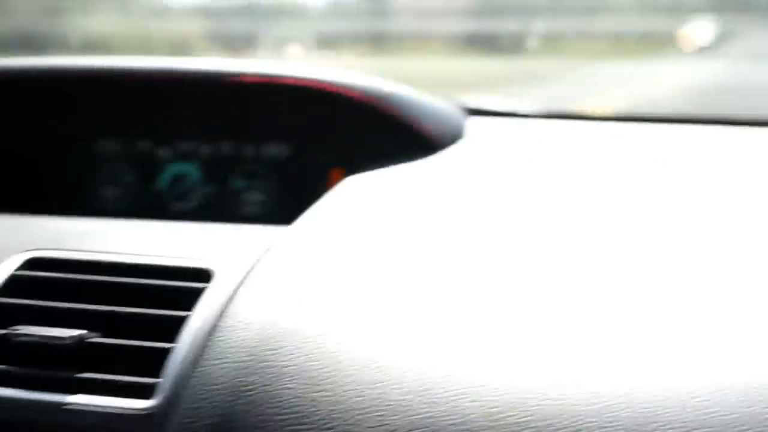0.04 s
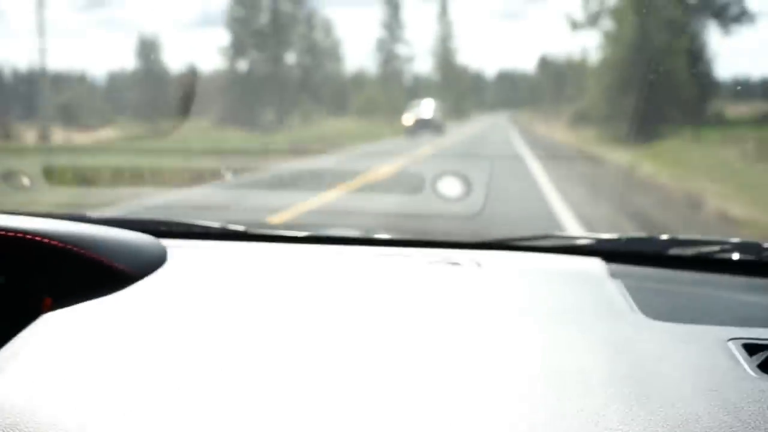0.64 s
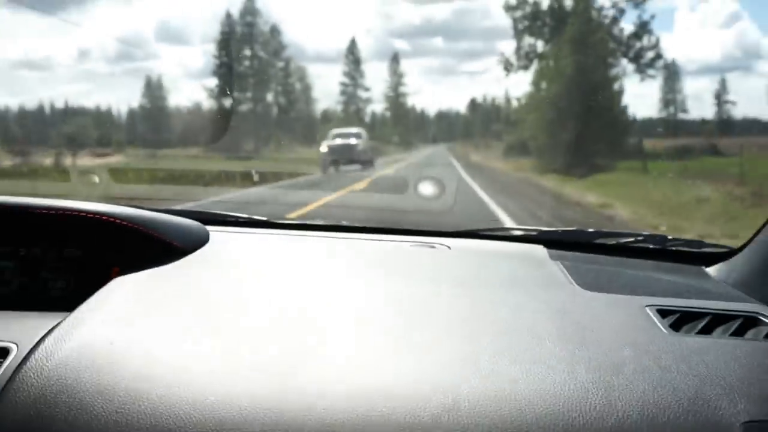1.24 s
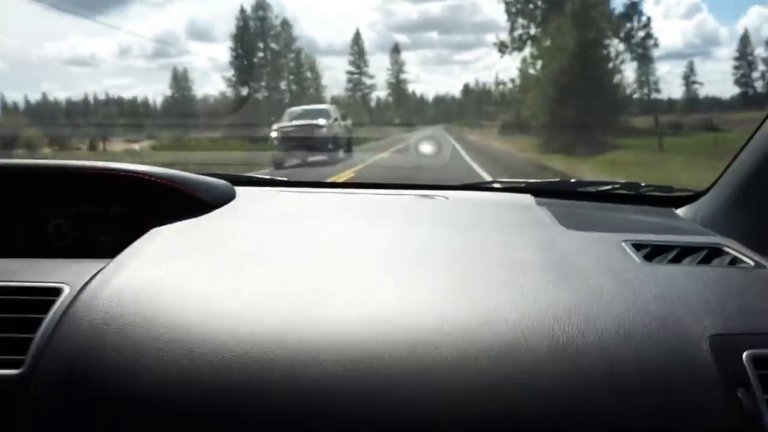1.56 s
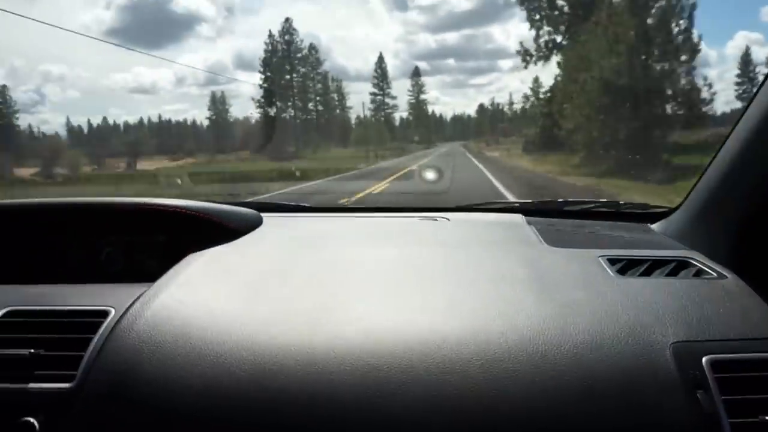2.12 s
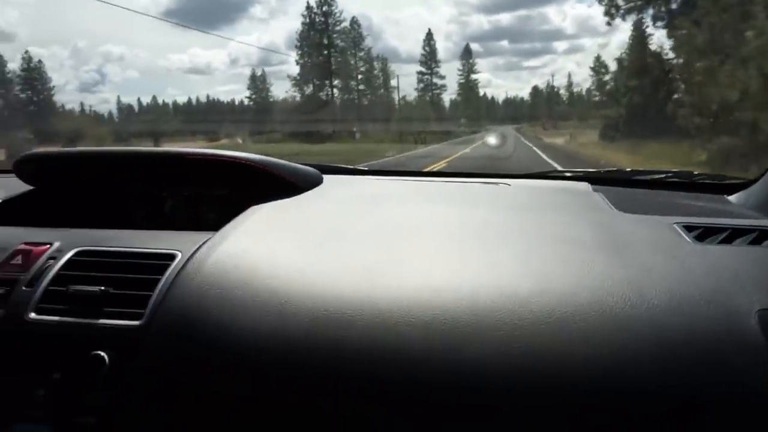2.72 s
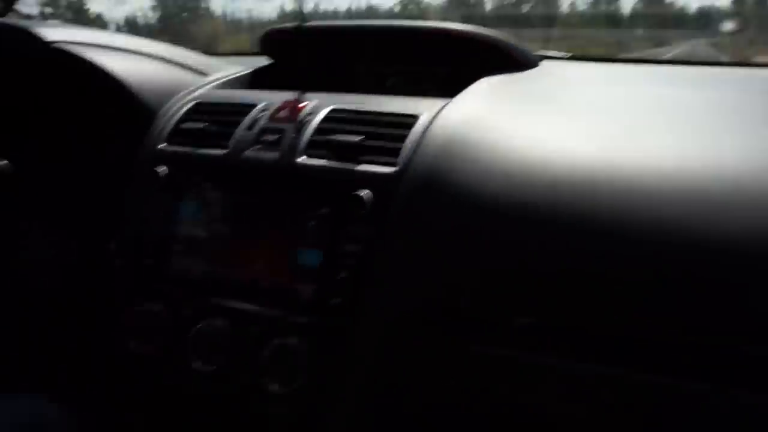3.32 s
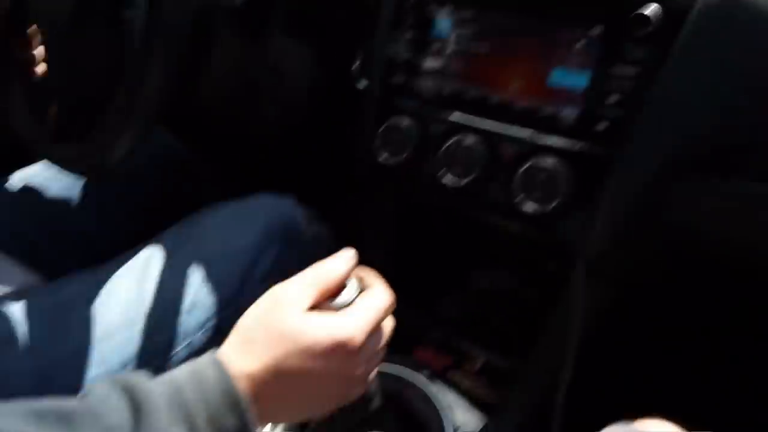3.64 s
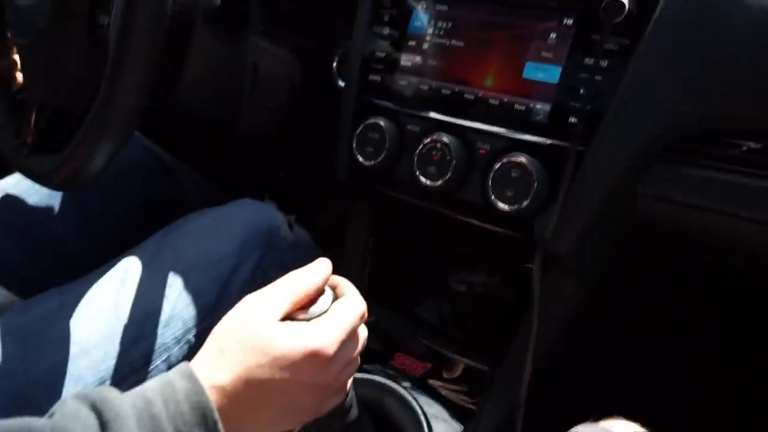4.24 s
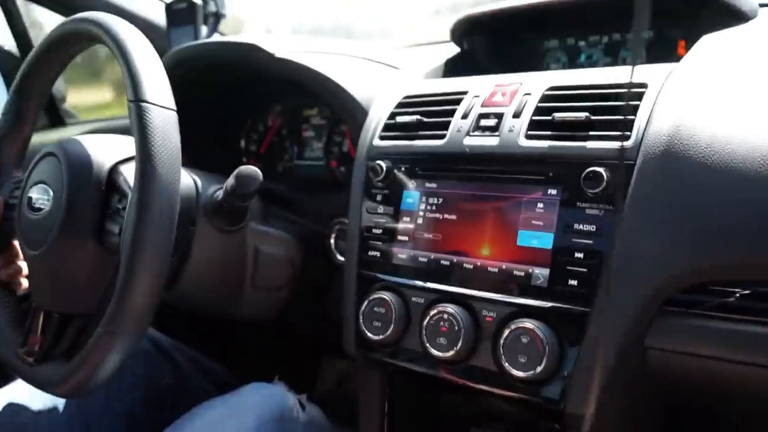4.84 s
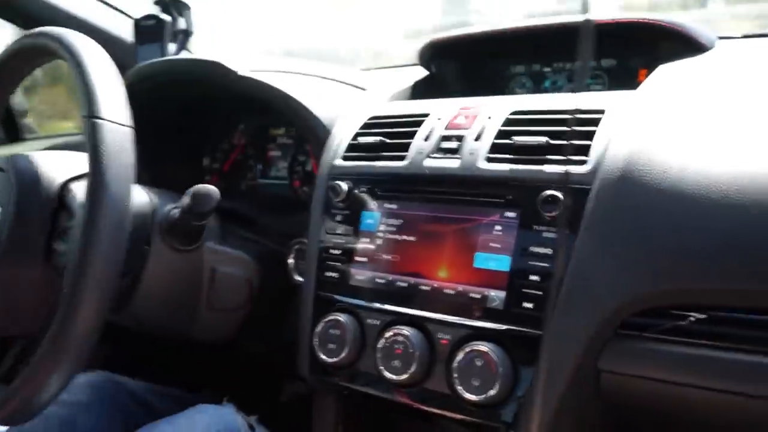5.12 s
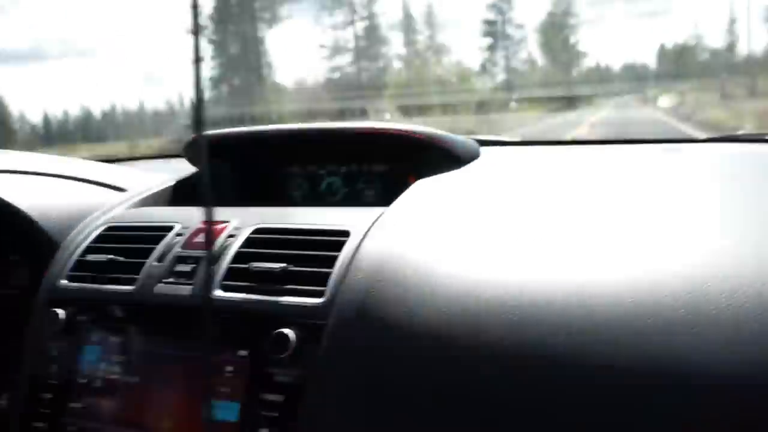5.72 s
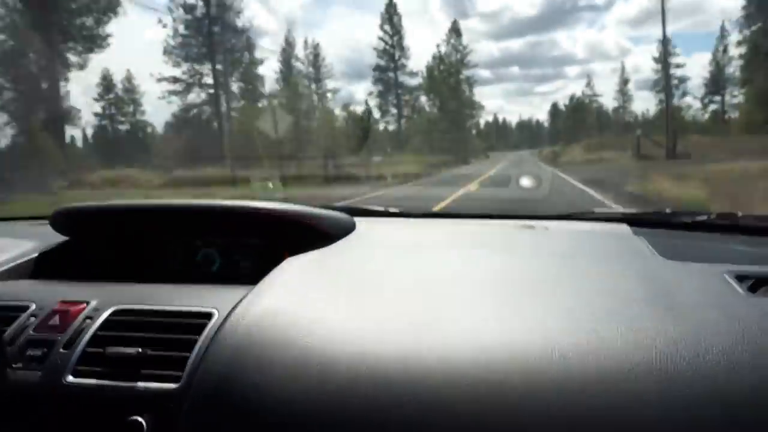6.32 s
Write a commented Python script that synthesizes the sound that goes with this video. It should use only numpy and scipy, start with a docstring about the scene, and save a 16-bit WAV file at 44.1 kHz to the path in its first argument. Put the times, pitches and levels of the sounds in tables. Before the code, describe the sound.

A turbocharged car accelerates, heard from inside, its whistle climbing over road rumble until a gearshift vents air and drops the revs.

```python
"""Inside a car, a turbocharged flat-four pulls hard. Its periodic firing booms in the cabin; uneven
combustion adds a burble and an exhaust rasp. Tyres and wind rush underneath, the trim ticks, and the
compressor's whistle climbs with its speed. At full boost the intake roars, hisses and howls; then the
throttle shuts with a falling honk, the boost air vents, the revs sink and the next gear takes up
with a thump."""
import sys
import numpy as np
from scipy import signal
from scipy.fft import rfft, irfft, next_fast_len
from scipy.io import wavfile
from scipy.ndimage import uniform_filter1d, minimum_filter1d, map_coordinates

SR = 44100
rng = np.random.default_rng(int(sys.argv[2]) if len(sys.argv) > 2 else 0)


def dump(signal):
    """Clip the signal to [-1, 1] and save it as 16-bit WAV at the path in sys.argv[1]."""
    limited = np.clip(np.atleast_2d(signal).T, -1, 1)
    pcm = np.round(limited * 32767).astype(np.int16)
    wavfile.write(sys.argv[1], SR, pcm)


N = 280476
TIME = np.arange(N) / SR
TOP_HZ = 15850

# turbo speed, as the pitch of its whistle: t/s, f/Hz
TURBO_SPEED = [(0, 3400), (1, 3900), (1.65, 4750), (2, 5580), (3, 7520), (3.42, 8600), (4.2, 10620),
               (4.4, 12200), (4.6, 14200), (4.75, 15200), (4.9, 15650), (5.1, 15600), (5.2, 14550),
               (5.45, 10050), (5.62, 8250), (5.8, 7000), (6.01, 6200), (6.36, 5680)]


def amp(db):
    """Amplitude ratio of a level in decibels."""
    return 10 ** (np.asarray(db) / 20)


def unit(x):
    """Normalisation to rms 1."""
    return x / np.sqrt(np.mean(x ** 2) + 1e-20)


def along(points, hz):
    """Interpolation of (f/Hz, value) points on a logarithmic frequency axis."""
    f, values = np.transpose(points)
    return np.interp(np.log(hz + 1), np.log(f + 1), values)


def curves(rows):
    """Linear interpolation of each column after t/s, one value a sample."""
    times, *columns = np.transpose(rows)
    return [np.interp(TIME, times, column) for column in columns]


def wobble(rate, size=N):
    """Smooth random modulation: a spline through rate knots a second."""
    knots = rng.standard_normal(16384)
    return map_coordinates(knots, [np.linspace(0, rate * N / SR, size)], mode="wrap")


def angle(hz):
    """Phase as the time integral of frequency."""
    return 2 * np.pi * np.cumsum(hz) / SR


def tone(phase):
    """A sinusoid of rms 1."""
    return np.sqrt(2) * np.cos(phase)


def band(phase, rate):
    """Narrow-band noise: random quadrature modulation spreads a carrier, more widely at a higher rate."""
    return wobble(rate) * np.cos(phase) + wobble(rate) * np.sin(phase)


def bursts(rows, attack, t60):
    """Envelope of events (t/s, hold/s, level/dB): linear rise, hold, exponential decay."""
    return sum(np.clip((TIME - s) / attack, 0, 1) * amp(db - 60 * np.maximum(TIME - s - hold, 0) / t60)
               for s, hold, db in rows)


def filtered(x, response):
    """Linear filtering: the spectrum of x times a complex frequency response."""
    size = next_fast_len(N + SR // 4)
    return irfft(rfft(x, size) * response(np.fft.rfftfreq(size, 1 / SR)), size)[..., :N]


def dispersed(x, spread_s, span_hz):
    """Dispersion in pipe and cabin: group delay swings with frequency, so each pulse rings out."""
    return filtered(x, lambda hz: np.exp(-1j * spread_s * span_hz * np.sin(2 * np.pi * hz / span_hz)))


def turbulence(spectrum, patchy_db, peaks=()):
    """Turbulent stereo noise of rms 1, coherent in the bass and incoherent in the treble."""
    # likeness of left and right: f/Hz, correlation
    coherence = [(100, 1), (250, 0.97), (500, 0.89), (1000, 0.97), (2000, 0.54), (4000, 0.43), (8000, 0)]
    spectra = signal.stft(rng.standard_normal((2, N)), nperseg=512)[2]
    patches = uniform_filter1d(rng.standard_normal(spectra.shape[1:]), size=7, axis=0)
    patches = uniform_filter1d(patches, size=9, axis=1)
    pair = signal.istft(spectra * amp(patchy_db * unit(patches)), nperseg=512)[1][:, :N]

    def response(hz):
        turn = np.arccos(np.clip(along(coherence, hz), -1, 1)) / 2
        lift_db = sum(db / (1 + (2 * (hz - centre) / width) ** 2) for centre, width, db in peaks)
        return amp(along(spectrum, hz) + lift_db) * np.array([np.cos(turn), np.sin(turn)])

    mid, side = filtered(pair, response)
    return unit(np.array([mid + side, mid - side]))


def harmonics(cycle, cycle_hz, orders, rough, rough_rate, body=None):
    """Cycle harmonics, weighted by any fixed body response; uneven combustion modulates each one."""
    step = 8  # decimation factor
    phase, hz, out = cycle[::step], cycle_hz[::step], 0
    shake = lambda: rough * wobble(rough_rate, size=len(hz))
    for order, db in orders:
        colour_db = along(body, round(order) * hz) if body else 0
        out = out + amp(db + colour_db) * (1 + shake()) * tone(round(order) * phase + shake())
    return signal.resample_poly(out, step, 1, window=("kaiser", 10))[:N]


def spool(db_per_octave):
    """Power law of turbo speed, as a level: 0 dB at top speed."""
    hz, = curves(TURBO_SPEED)
    return db_per_octave * np.log2(hz / hz.max())


def boosted(db_per_octave, shut_s, fall_db_per_s):
    """Level in dB that follows the power law of turbo speed and collapses as the throttle shuts."""
    return spool(db_per_octave) - fall_db_per_s * np.maximum(TIME - shut_s, 0)


def firing_boom(cycle, cylinders=4, phase_rad=1.55):
    """Periodic excitation: each cylinder fires once a cycle, making a tone at the firing rate."""
    # firing tone: t/s, level/dB
    levels = [(0, -8), (1.3, -8), (2.45, -12), (3.1, -11.5), (3.52, -12.5), (3.67, -7.5), (4.3, -7.5),
              (4.6, -11), (5, -15.5), (5.11, -9), (5.36, -14.5), (5.56, -8), (5.68, -10.5), (5.77, -20),
              (5.87, -8.5), (5.97, -14.5), (6.06, -8.5), (6.36, -8.5)]
    return amp(curves(levels)[0] + .6 * wobble(20)) * tone(cylinders * cycle + phase_rad)


def burble(cycle, cycle_hz):
    """Unequal firings add low harmonics, which sweep through the cabin's standing waves."""
    # low harmonics: order, level/dB
    orders = [(2, -9.5), (3, 8), (5, -9.5), (6, 2.5), (7, 0), (8, -1.5)]
    # cabin response: f/Hz, gain/dB
    cabin_modes = [(55, -14), (78, -28.5), (90, -19.5), (110, -27.5), (143, -7), (167, -30.5), (195, -16.5),
                   (210, -20.5), (230, -38), (262, -22.5), (290, -37)]
    return harmonics(cycle, cycle_hz, orders, rough=.11, rough_rate=14, body=cabin_modes)


def exhaust_rasp(cycle, cycle_hz):
    """Source and filter: the exhaust pipe's resonances colour the higher harmonics."""
    # higher harmonics: order, level/dB
    orders = [(9, 2), (10, -6.5), (11, 10.5), (12, 3.5), (13, 6), (14, -6.5), (15, 10.5), (16, 6), (17, 10),
              (18, -4), (19, 9), (20, -6), (21, -1), (22, -2), (23, -5), (24, -4)]
    # exhaust response: f/Hz, gain/dB
    pipe = [(240, -41), (310, -38.5), (370, -40.5), (425, -47), (470, -39), (515, -33), (570, -39.5),
            (660, -38), (740, -41.5)]
    pulses = harmonics(cycle, cycle_hz, orders, rough=.31, rough_rate=5.5, body=pipe)
    return dispersed(pulses, spread_s=.008, span_hz=260.9)


def clatter(cycle, width=.5, steps=512):
    """Valves and combustion repeat a slowly changing rattle each cycle; periodicity gives a line comb."""
    # envelope of the comb: f/Hz, gain/dB
    spectrum = [(400, -22.5), (700, 6.5), (1050, -4), (1350, -6), (1700, -11), (2300, -12.5), (3000, -19.5),
                (5000, -33), (8000, -61)]
    place = [cycle / (2 * np.pi) % 1 * steps]
    loop = lambda: map_coordinates(rng.standard_normal(steps), place, order=1, mode="grid-wrap")
    drift = .98 * wobble(2.02)
    mid, side = [np.cos(drift) * loop() + np.sin(drift) * loop() for _ in range(2)]
    pair = np.array([mid + width * side, mid - width * side])
    return unit(filtered(pair, lambda hz: amp(along(spectrum, hz))))


def road(cycle, pulsing=.098):
    """Random excitation: asphalt shakes the body; tyres, wind and engine roar, pulsing with the crank."""
    # road noise: t/s, rumble level/dB, roar level/dB
    levels = [(0, -13, -23), (.5, -16, -21.5), (1.2, -17, -25.5), (2, -15.5, -23), (3.1, -16.5, -23),
              (4.2, -21.5, -26), (5.2, -17.5, -21), (5.55, -17, -24.5), (6.05, -17, -19.5),
              (6.36, -14, -22.5)]
    # bumps in the asphalt: t/s, hold/s, level/dB
    bumps = [(.92, 0.046, -13.5), (1.09, .06, -9.5), (1.56, .06, -16), (3.31, 0.044, -22), (5.82, .05, -9),
             (6.06, 0.069, -10)]
    # body rumble: f/Hz, relative density/dB
    rumble_spectrum = [(15, -8), (28, -2), (50, -4.5), (80, -4), (120, -3.5), (200, -7), (280, -21.5),
                       (500, -44.5), (1000, -100)]
    # roar: f/Hz, relative density/dB
    roar_spectrum = [(100, -8), (220, 5.5), (350, 3.5), (520, -2), (700, -2), (950, -2.5), (1300, -11.5),
                     (2000, -15.5), (2600, -21), (3500, -25.5), (6000, -33.5), (9000, -41), (16000, -52)]
    # panel and vent resonances: f/Hz, width/Hz, lift/dB
    panels = [(885, 90, 1), (1455, 24, 4), (1682, 43, 4.5), (2076, 70, 5), (2740, 24, 2), (4900, 43, 3),
              (5400, 80, 5)]
    rumble_db, roar_db = curves(levels)
    shaking = np.hypot(amp(rumble_db), bursts(bumps, attack=.044, t60=.6))
    rumble = shaking * turbulence(rumble_spectrum, patchy_db=.5)
    beat = 1 + pulsing * np.cos(2 * cycle)
    return rumble + amp(roar_db) * beat * turbulence(roar_spectrum, patchy_db=1.5, peaks=panels)


def compressor_hiss(top_db=-43):
    """Turbulent flow through the compressor makes broadband noise that grows with turbo speed."""
    # flow noise: f/Hz, relative density/dB
    spectrum = [(800, -39), (2500, -6), (5000, 0), (8500, -1.5), (10500, -7.5), (13500, -14),
                (16000, -14.5)]
    return amp(top_db + spool(db_per_octave=7)) * turbulence(spectrum, patchy_db=1.6)


def turbo_whistle(flutter=.0045, core=.72, fuzz=.5, skirt=.45, haze=.6):
    """The compressor's blade-passing tone and its octave, broadened by turbulence into breathy bands."""
    # the whistle flares or sinks: t/s, half width/s, lift/dB
    flares = [(1.3, .45, 3), (3.38, 0.16, 10), (3.95, .25, -3.5), (4.8, .16, 4), (5.3, .12, -3),
              (5.98, .1, 12), (6.25, .18, 6)]
    hz, = curves(TURBO_SPEED)
    level_db = -53 + spool(db_per_octave=5) + 2 * wobble(11)
    flare_db = sum(db * np.exp(-((TIME - s) / width) ** 2) for s, width, db in flares)
    blades = angle(hz * (1 + flutter * wobble(18)))

    def whistle():
        line = core * amp(2.8 * wobble(16)) * tone(blades + 1.5 * wobble(15))
        return line + fuzz * band(blades, 160) + skirt * band(blades, 900) + haze * band(blades, 2400)

    octave = amp(-46.5 + spool(db_per_octave=14.5)) * (2 * hz < TOP_HZ) * band(2 * blades, 250)
    return amp(level_db + flare_db) * np.array([whistle(), whistle()]) + octave


def trim_ticks():
    """Impact noise: tiny contacts in the trim make spiky, slightly dulled runs that die away."""
    # ticks and rattles: t/s, level/dB, t60/s
    ticks = [(.09, -46, .15), (.41, -50, .15), (.665, -45, .2), (1.113, -38, .035), (1.474, -36, .012),
             (6.315, -44, .02)]
    out, t = np.zeros(N + SR), np.arange(SR // 2) / SR
    for s, db, t60 in ticks:
        contacts = unit(signal.lfilter([1], [1, -.5], rng.standard_normal(len(t)) ** 3))
        out[round(s * SR):][:len(t)] += amp(db - 60 * t / t60) * contacts
    return out[:N]


def intake_roar(cycle, cycle_hz):
    """Periodic flow in the intake sounds harmonics of the cycle, growing steeply with boost."""
    # harmonics at full boost: order, level/dB
    orders = [(5, -21), (7, -36.5), (8, -26), (9, -20), (10, -23), (11, -34), (12, -33), (13, -24.5),
              (15, -24.5), (28, -35.5), (29, -36), (30, -49.5), (31, -35.5)]
    level_db = 1.5 + boosted(db_per_octave=65, shut_s=5.04, fall_db_per_s=137)
    pulses = amp(level_db) * harmonics(cycle, cycle_hz, orders, rough=.18, rough_rate=12)
    return dispersed(pulses, spread_s=.0046, span_hz=262)


def boost_rush(cycle, pulsing=.11):
    """Turbulence at full boost excites the intake's resonances, pulsing with the crankshaft."""
    # rushing air: f/Hz, relative density/dB
    spectrum = [(400, -33.5), (1050, 3.5), (1450, -0.5), (2300, 1), (3100, -2.5), (4800, -2.5), (8000, -9),
                (12000, -11.5), (16000, -18)]
    # intake tract resonances: f/Hz, width/Hz, lift/dB
    tract = [(1710, 100, 4.5), (1817, 110, 11.5), (2335, 54, 11), (2560, 170, 9), (3550, 44, 9.5),
             (4480, 66, 9)]
    # the rush opens abruptly into a loud hiss: t/s, hold/s, level/dB
    surge = [(4.68, 0.32, -25)]
    level_db = -28 + boosted(db_per_octave=66, shut_s=5.005, fall_db_per_s=45)
    envelope = np.hypot(amp(level_db), bursts(surge, attack=.11, t60=.34))
    gulps = 1 + pulsing * np.cos(2 * cycle)
    return envelope * gulps * turbulence(spectrum, patchy_db=.7, peaks=tract)


def intake_howl(width_hz=110, rise_hz_per_s=330):
    """Flow past the intake mouth excites a pipe resonance: a fuzzy, rising tone, unlike at each ear."""
    # howls: t/s, hold/s, starting f/Hz, level/dB
    howls = [(4.518, 0.5, 1636, -34.5), (5.096, 0.044, 1654, -28.5), (5.327, .07, 1680, -41)]
    out = 0
    for s, hold, hz, db in howls:
        phase = angle(hz + rise_hz_per_s * (TIME - s))
        fuzzy = np.array([band(phase, width_hz) for _ in range(2)])
        out = out + bursts([(s, hold, db)], attack=.041, t60=.4) * fuzzy
    return out


def driveline_thumps(attack=.027):
    """Changes of load set the driveline into damped oscillation."""
    # thumps: t/s, level/dB, f/Hz, t60/s
    thumps = [(4.66, -12.5, 44.8, 0.33), (5.22, -6.5, 82.4, 0.51), (5.42, -6, 50.5, 0.28),
              (5.662, -6, 83, 0.39), (5.819, 3.5, 68.5, .22)]
    out, t = np.zeros(N + SR), np.arange(SR // 2) / SR
    for s, db, hz, t60 in thumps:
        envelope = amp(db - 60 * t / t60) * (1 - np.exp(-t / attack))
        out[round(s * SR):][:len(t)] += envelope * np.sin(2 * np.pi * hz * t)
    return out[:N]


def throttle_honk(rasping=.31):
    """The intake note glides down as the throttle plate closes; random modulation roughens it."""
    # intake note: t/s, f/Hz, level/dB
    glide = [(5.07, 480, -45), (5.115, 455, -19), (5.155, 440, -16), (5.185, 392, -22), (5.205, 345, -17),
             (5.222, 320, -25), (5.24, 300, -70)]
    hz, db = curves(glide)
    phase = angle(hz * (1 + .017 * wobble(120)))
    sounding = db > max(db[0], db[-1])
    partials = tone(phase) + amp(-14) * tone(2 * phase) + amp(-23) * tone(3 * phase)
    return amp(db) * sounding * (1 + rasping * wobble(130)) * partials


def boost_vent():
    """Jet noise: compressed air escapes in puffs once the throttle shuts."""
    # puffs: t/s, hold/s, level/dB
    puffs = [(5.09, .05, -30.5), (5.23, .14, -34), (5.44, .04, -40), (5.62, .19, -42)]
    # escaping air: f/Hz, relative density/dB
    spectrum = [(600, -32.5), (1700, 4), (3000, 1), (7000, -2.5), (10000, -9.5), (16000, -19)]
    return bursts(puffs, attack=.03, t60=.47) * turbulence(spectrum, patchy_db=1.5)


def coasting_hum(cycle, cycle_hz, db_per_hz=.45):
    """With the throttle shut, harmonics of the crankshaft's rotation hum and fade as the revs sink."""
    # coasting: t/s, hold/s, level/dB
    spell = [(5.15, 0.56, -12.5)]
    # even harmonics of the cycle: order, level/dB
    orders = [(2, -8), (6, -1.5), (8, -24)]
    envelope = bursts(spell, attack=.17, t60=.26) * amp(db_per_hz * (cycle_hz - cycle_hz.max()))
    return envelope * harmonics(cycle, cycle_hz, orders, rough=.063, rough_rate=9.4)


def scene(left_lag_s=.00011):
    """Superposition at the passenger seat, with interaural differences of level and time."""
    # four-stroke cycle rate: t/s, f/Hz
    speed = [(0, 26.7), (1.3, 27.9), (1.7, 28.21), (2.1, 28.96), (2.5, 29.54), (2.9, 30.49), (3.3, 31.49),
             (3.7, 32.12), (4.1, 33.35), (4.5, 35.05), (4.95, 36.6), (5.1, 36.77), (5.22, 37.85),
             (5.36, 36.82), (5.7, 31.15), (5.86, 27.18), (6.05, 27.54), (6.36, 27.7)]
    # engine load, dropping for the gearshift: t/s, level/dB
    load = [(0, 0), (.8, 0.9), (1.6, -0.56), (2.4, .5), (2.9, -.7), (3.5, .5), (4, -1.5), (4.3, 1.5),
            (4.65, 0.5), (5.15, -4.5), (5.78, -22), (5.9, -8), (6.2, -0.5), (6.36, -3.5)]
    # left ear relative to right: f/Hz, level/dB
    balance = [(100, 0.5), (500, 1), (1000, -1), (2000, -2.5), (4000, -0.5), (8000, -4.5), (14000, -3)]
    cycle_hz = curves(speed)[0] * (1 + .002 * wobble(15))
    cycle = angle(cycle_hz)
    load_db, = curves(load)
    rasp_db = 1.43 * load_db - .64  # follows the load more steeply than the burble
    engine = (firing_boom(cycle) + amp(load_db + 1.5) * burble(cycle, cycle_hz)
              + amp(rasp_db) * exhaust_rasp(cycle, cycle_hz) + intake_roar(cycle, cycle_hz)
              + coasting_hum(cycle, cycle_hz) + amp(rasp_db - 32.5) * clatter(cycle) + throttle_honk())
    chassis = driveline_thumps() + trim_ticks() + road(cycle)
    air = compressor_hiss() + boost_rush(cycle) + boost_vent() + intake_howl() + turbo_whistle()
    side = np.array([[.5], [-.5]])
    ears = lambda hz: amp(side * along(balance, hz)) * np.exp(-2j * np.pi * hz * left_lag_s * side)
    return filtered(engine + chassis + air, ears)


def record(dry):
    """Peak limiting to full scale by a fast, smoothed gain, then band limiting."""
    needed = 1 / np.maximum(np.abs(dry).max(axis=0), 1)
    held = minimum_filter1d(needed, size=241)
    gain = uniform_filter1d(uniform_filter1d(held, size=121), size=121)
    return filtered(dry * gain, lambda hz: hz < TOP_HZ)


dry = scene()
out = record(dry)
dump(out)
```